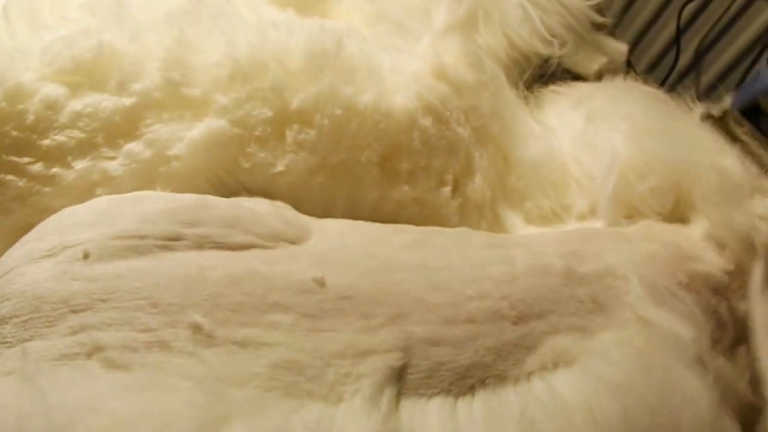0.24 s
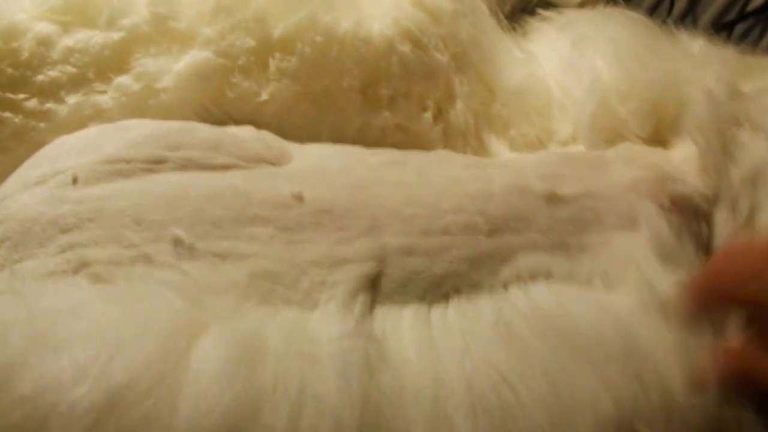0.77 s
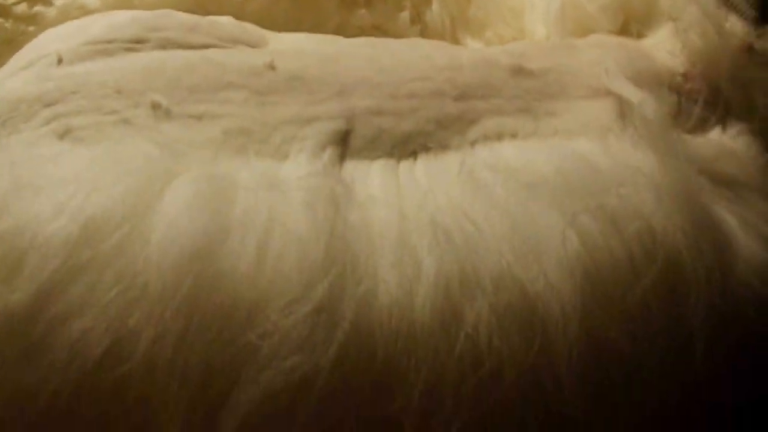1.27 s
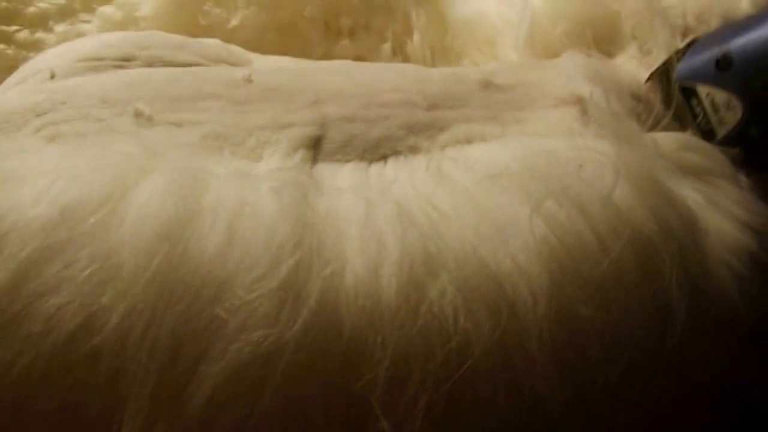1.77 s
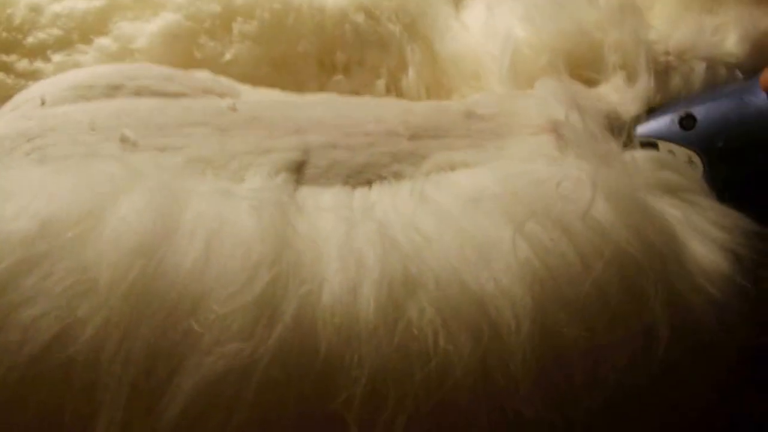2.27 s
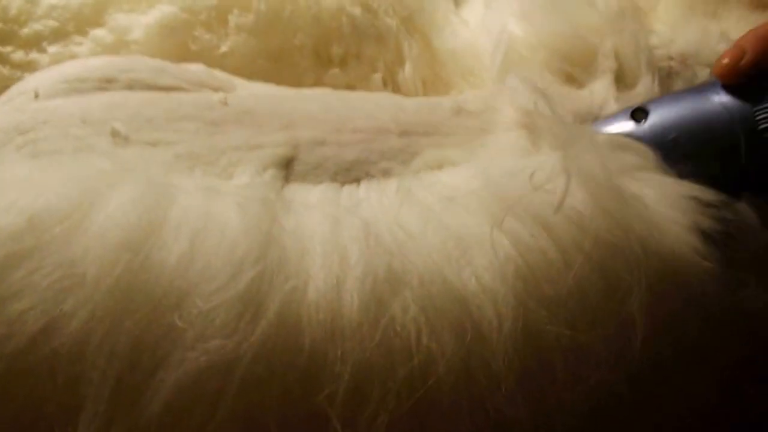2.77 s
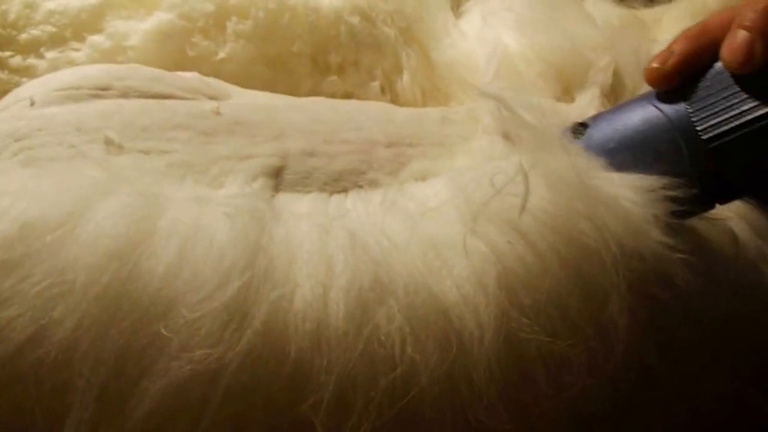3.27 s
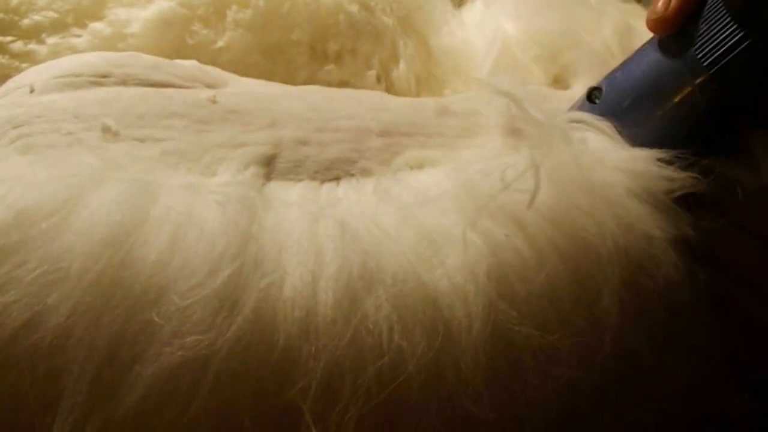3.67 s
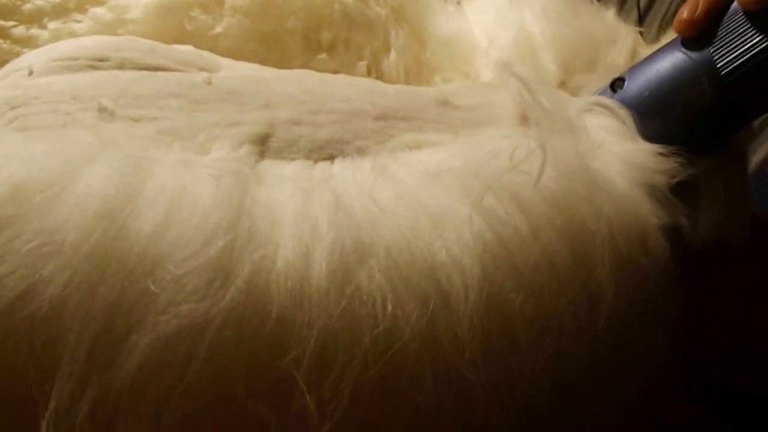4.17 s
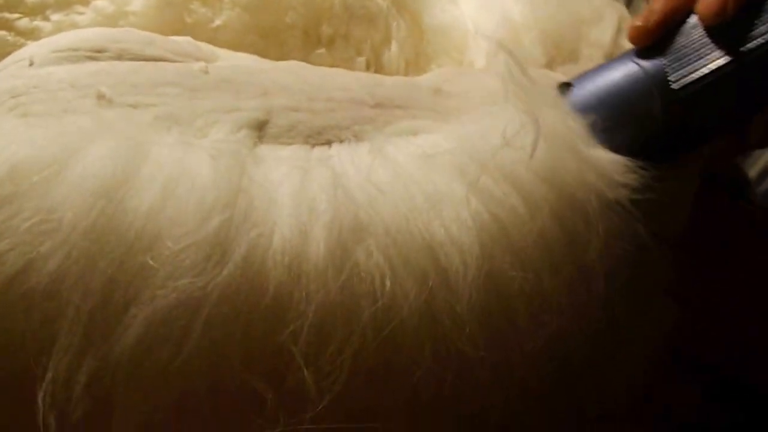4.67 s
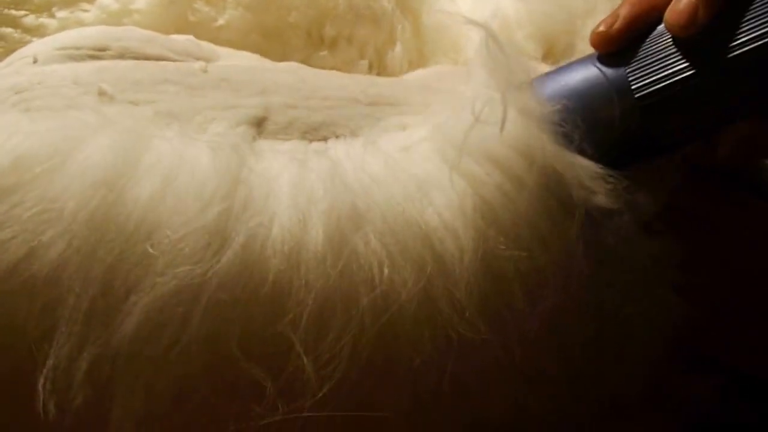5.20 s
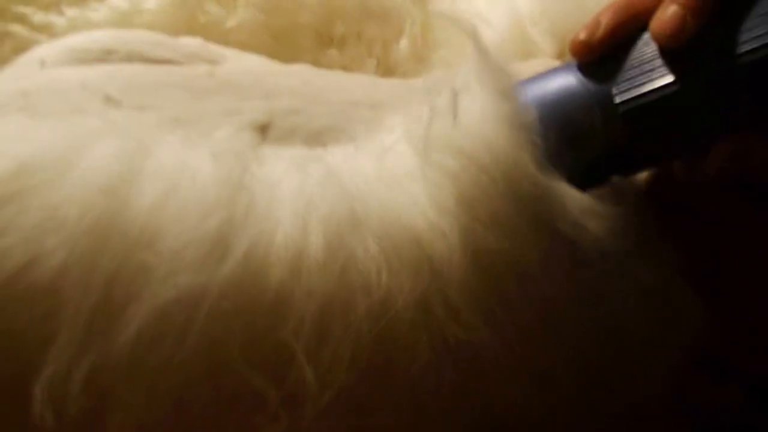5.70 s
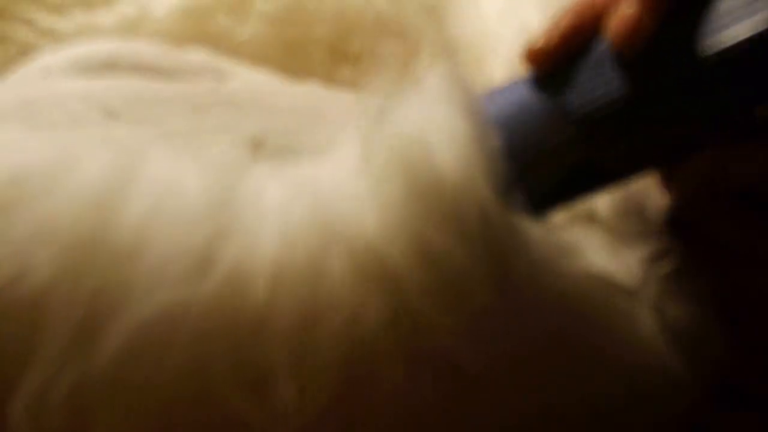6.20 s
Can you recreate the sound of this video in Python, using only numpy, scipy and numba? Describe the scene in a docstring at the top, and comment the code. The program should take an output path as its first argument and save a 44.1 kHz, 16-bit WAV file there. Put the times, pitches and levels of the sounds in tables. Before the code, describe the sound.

A continuous, bright clipper buzz, close and slightly right of centre, in a quiet indoor space. Fast blade reversals make a coarse metallic chatter, with a whining motor, ringing plastic housing and sizzling steel. Near one second there is a lone hard click. Later the buzz grows grittier and slightly lower as fur loads the blade, hair crunching faintly, while a hand brushes the coat almost inaudibly underneath.

```python
"""Electric clippers shear a long-haired animal, close to the microphone.
From the start a motor whines and drives a cam through a 3:20 gear; the cam throws the blade to and fro, and each
reversal knocks the housing. Gear teeth and blade rasp in a pattern that repeats every six strokes, hair crunches,
and the motor slows a little as the blade bites into fur. Single tones flare up and sink, over a faint room rumble.
After about a second something clicks once; then a hand rustles in the coat, with two soft bumps.
A limiter turns the sound down after the highest peaks."""
import sys
import numpy as np
from scipy import signal
from scipy.fft import rfft, irfft
from scipy.io import wavfile
from scipy.ndimage import uniform_filter1d, map_coordinates
from numba import njit

SR = 44100
rng = np.random.default_rng(int(sys.argv[2]) if len(sys.argv) > 2 else 0)


def waveform_to_disk(signal):
    """Save audio, clipped to [-1, 1], as 16-bit WAV at the path in sys.argv[1]."""
    frames = np.transpose(np.atleast_2d(signal))
    scaled = np.clip(frames, -1, 1) * 32767
    samples = np.round(scaled).astype(np.int16)
    wavfile.write(sys.argv[1], SR, samples)


N = 284429
T = np.arange(N) / SR
FREQS = np.maximum(np.arange(N // 2 + 1) * SR / N, 1)

# one gear cycle: 20 motor turns make 3 cam turns, and each cam turn makes two strokes
CAM_RATIO, STROKES, MOTOR_TURNS = 3 / 20, 6, 20
# turns of the bearing cage per turn of the motor, and the point in its turn where the play is widest (turns)
CAGE_RATIO, CAGE_PLAY = 0.3283, 0.35
# motor speed with no load (turns per second); the sag below it shows how hard the blade works
FREE_HZ = 305.5
# the motor speed trembles slightly: typical size (turns per second) and changes per second
TREMBLE_HZ, TREMBLES_PER_S = 0.15, 14
# motor speed, which sags when the blade meets thick fur: time_s, speed_hz
MOTOR_SPEED = [(0, 303), (0.35, 304.93), (0.95, 305.53), (1.7, 305.06), (2.2, 305.45), (2.8, 305.05),
               (3.2, 303.47), (3.75, 303.52), (4.35, 304.26), (4.75, 303.09), (5.35, 304.88), (5.8, 303.73),
               (6.15, 303.77), (6.45, 304.88)]

# steady tones of motor and gear: multiple (of the motor speed), level_db
STEADY_TONES = [(0.1, -63), (0.15, -62), (1.65, -64), (1.8, -58), (1.95, -59), (2.4, -55.5), (2.7, -56),
                (3.75, -54), (3.9, -51), (4.35, -54), (4.5, -55), (4.8, -51), (4.95, -53.5), (5.1, -48.5),
                (5.25, -50), (5.55, -48.5), (5.7, -54), (5.85, -47.5), (6.15, -51), (6.3, -47.5),
                (6.45, -47.5), (6.6, -49), (6.75, -49), (7, -47), (7.65, -40.5), (8, -44), (8.25, -42.5),
                (8.55, -44), (9, -42.5), (9.7, -41), (10, -40), (11.4, -44), (14, -52.5), (17, -55),
                (18, -56), (20, -53), (21, -48), (22, -46), (27, -43), (29, -43.5), (30, -56), (31, -51.5),
                (33, -56)]
# the strongest tones: name, multiple (of the motor speed)
# the bearing cage adds side tones, and "beat" beats against a gear tone
SINGING_TONES = {"hum": 1.05, "purr": 1.35, "rotor": 2, "growl": 4, "drone": 6, "beat": 8 - CAGE_RATIO,
                 "grind": 7.95, "mesh": 10.05, "snarl": 10.35, "burr": 10.65, "ring": 11, "zing": 11.7,
                 "sing": 12, "low warble": 16 - CAGE_RATIO, "warble": 16, "high warble": 16 + CAGE_RATIO,
                 "whine": 24, "keen": 25, "shrill": 26, "sizzle": 28, "squeak": 32}
# level of the singing tones between flares: name, level_db
RESTING_TONE_LEVELS = {"hum": -67.5, "purr": -65, "rotor": -48.2, "growl": -47, "drone": -46, "beat": -43,
                       "grind": -49, "mesh": -38.5, "snarl": -48, "burr": -43.5, "ring": -37.5, "zing": -43,
                       "sing": -38.5, "low warble": -52, "warble": -47, "high warble": -55, "whine": -41.5,
                       "keen": -36.5, "shrill": -45, "sizzle": -40, "squeak": -47.5, "squeal": -27}
# a tone flares up or sinks as the clippers lean into or out of a resonance: start_s, end_s, name, gain_db
FLARES = [(1.3, 6.6, "hum", 3), (1.75, 6.6, "hum", 6.5), (4.5, 6.6, "hum", 4.5), (1.25, 6.6, "purr", 6),
          (2.1, 6.6, "purr", 4.5), (1.62, 1.85, "rotor", -9), (2.9, 3.5, "rotor", -7),
          (4.85, 6.6, "rotor", -5), (6.1, 6.35, "rotor", -7), (1.6, 1.85, "growl", -9),
          (3.7, 6.6, "growl", 3), (0.42, 1.15, "drone", 7), (0.45, 0.92, "drone", 5.5),
          (1.45, 2.25, "drone", 7), (3.4, 4.15, "drone", 7), (5.85, 6.6, "drone", 7.5),
          (2.2, 2.85, "beat", -5), (2.9, 6.6, "beat", 1.5), (4.65, 6.6, "grind", 9),
          (2.25, 4.75, "mesh", 5), (2.9, 3.7, "mesh", 2.5), (5.5, 6.1, "mesh", -5), (5.9, 6.6, "snarl", 12),
          (1.4, 3.1, "burr", 5), (1.05, 1.27, "ring", 7), (1.8, 2.6, "ring", 7), (2.88, 3.7, "ring", 6),
          (4.05, 4.7, "ring", -9), (1.25, 1.65, "zing", 10), (-0.1, 0.85, "sing", -7),
          (2.45, 3.15, "sing", -6), (3.55, 3.9, "sing", -12), (4.5, 6.6, "sing", 3),
          (0, 0.35, "low warble", 8), (0.6, 0.92, "low warble", 8), (1.12, 1.55, "low warble", 6),
          (1.85, 2.4, "low warble", 8), (2.6, 3.55, "low warble", 6.5), (5.6, 6.3, "low warble", 4),
          (0.06, 0.33, "warble", 6), (1.5, 1.8, "warble", -7), (1.9, 3.15, "warble", 3),
          (2.55, 3.1, "warble", 3.5), (3.22, 3.5, "warble", -10), (3.65, 4.05, "warble", 4),
          (4.2, 4.85, "warble", -3), (5.52, 6.2, "warble", 6), (0.76, 1, "high warble", 10),
          (1.22, 1.62, "high warble", 11), (2.15, 2.62, "high warble", 10), (2.62, 3.1, "high warble", 4),
          (6.32, 6.6, "high warble", 11), (0.22, 0.55, "whine", 10), (0.62, 1.15, "whine", 9),
          (1.22, 1.42, "whine", 8), (1.55, 1.85, "whine", 8), (2.03, 2.55, "whine", 10),
          (3.95, 4.5, "whine", 6), (4.68, 5.85, "whine", 9), (1.85, 2.95, "keen", -9), (4.5, 5, "keen", -5),
          (6.1, 6.6, "keen", -8), (3.9, 4.7, "shrill", 6), (6.28, 6.6, "shrill", 10),
          (0, 0.22, "sizzle", 4), (1.75, 2.75, "sizzle", -8), (4.45, 4.7, "sizzle", -10),
          (0.45, 1.05, "squeak", 5), (1.1, 1.75, "squeak", -6), (3.05, 4.05, "squeak", 7),
          (4.15, 6.3, "squeak", 4), (5.7, 6.3, "squeak", 4.5), (1.5, 1.8, "squeal", 7.5),
          (1.8, 2.5, "squeal", 2), (3.3, 4.2, "squeal", 3)]
FLARE_FADE_S = 0.16
# short waves fade in and out as the clippers move: pitch_hz, depth (share of the tone)
FADING_DEPTH = [(300, 0.081), (1800, 0.12), (3300, 0.26), (5000, 0.49), (8000, .42)]
# changes per second of the slow fading and of the quick flutter, and the flutter's share
FADING_HZ, FLUTTER_HZ, FLUTTER_SHARE = 3.533, 17, 0.92
# the tight spot of the gear: place and half-width (strokes)
SQUEAL_PLACE, SQUEAL_WIDTH = 3.4, 0.65

# the six blade reversals of one gear cycle: place (strokes), free_force_db (running free),
# load_db (added at full drag), swing_db (up and down with the bearing cage)
REVERSALS = [(0.14, -13, 7, 0), (1.13, -7, 5, 0.5), (2.07, -7.5, 2, 0), (3.1, -6, 7, 0.5),
             (4.13, -8.5, 3, 0), (5.13, -4, 2.5, 2.2)]
# drag of the fur on the blade: time_s, drag (0 free to 1 full)
FUR_DRAG = [(0, 0.29), (0.95, 0.26), (1.8, 0.16), (2.45, 0.027), (3.2, 0.49), (4.3, 0.23), (4.75, 0.44),
            (5.3, 0.87), (5.9, 0.49), (6.45, 0.51)]
KNOCK_DB = -13.2
# the hand on the housing: time_s, housing_level_db (before both rings are adjusted),
# upper_ring_db (how far the grip frees or damps the ring), ring_pitch_hz
HAND_HOLD = [(0, -25, 2.5, 3150), (0.4, -26.5, 6, 2900), (0.8, -25, -2, 3180), (1.05, -25.5, 2.5, 3330),
             (1.3, -26, 4, 3130), (1.7, -24.5, 0, 3370), (2.1, -26, 0, 3270), (2.55, -30, 7, 3060),
             (3.25, -23.5, -0.5, 3160), (3.9, -26, -3, 3180), (4.4, -26, 2, 3080), (4.75, -25.5, -3, 3150),
             (5.6, -26.5, -2, 3100), (6.25, -23.5, 2.5, 3220), (6.45, -25.5, 5.5, 3280)]
# response of the plastic housing: pitch_hz, level_db
HOUSING_RESPONSE = [(760, -38), (1300, -17.5), (1690, -11.5), (1840, -15), (2220, -9), (2360, -10),
                    (2630, -6), (3240, 0), (3650, -6.5), (3860, -11.5), (4460, -24), (4600, -21.5),
                    (5980, -61.5), (10100, -120)]
# the lower ring of the housing: its change with no drag (dB), and what full drag adds (dB)
LOWER_RING_DB, LOWER_DRAG_DB = -5.5, 2.5
# the upper ring comes and goes in short clumps: typical swing (dB), changes per second
CLUMP_DB, CLUMPS_PER_S = 1.6, 20
# the gear catches and slips, so its rasp comes in short grains: typical swing (dB), changes per second
CATCH_DB, CATCHES_PER_S = 1.5, 300
# level of the blades' treble: time_s, level_db
BLADE_LEVEL = [(0, -29), (0.4, -30), (0.8, -27), (1.3, -28), (2.1, -31.5), (2.7, -30), (3.1, -29.5),
               (6.1, -28), (6.45, -27.5)]
# response of the steel blades: pitch_hz, level_db
STEEL_RESPONSE = [(2590, -36.5), (4400, -18.5), (4570, -20), (4810, -11), (5210, -9.5), (6040, -7),
                  (7490, 2.5), (9300, -5), (10100, -10), (10500, -16), (11800, -32), (14600, -24),
                  (15500, -28)]
# the shaking of the motor reaches the blades mostly in the top: pitch_hz, level_db
SHAKE_RESPONSE = [(6900, -10), (9800, -8), (10600, 3), (12000, 5.5)]
# the cut hair crunches louder under load
HAIR_DB, HAIR_DB_PER_SAG_HZ = -38.5, 0.4
# colour of hair crunching between the teeth: pitch_hz, level_db
HAIR_RESPONSE = [(150, -23), (250, -18.5), (330, -16.5), (440, -14.5), (600, -9.5), (760, -8), (950, 0.5),
                 (1150, -3), (1400, -11), (2000, -24), (4000, -28.5)]

# room rumble: pitch_hz, level_db
ROOM_RESPONSE = [(15, -9), (28, 3), (46, -1.5), (65, -8), (110, -9.5), (170, -19), (300, -23)]
# a lone click and soft bumps of the hand: start_s, level_db, pitch_hz, decay_s (twice the time to the peak)
CLICKS = [(1.0573, -3.5, 2150, 0.0011), (1.82, -53, 171, 0.037), (5.57, -49, 115, 0.045)]
# strokes of the hand in the coat: start_s, length_s, level_db
RUSTLES = [(1.777, 0.1, -46), (3.9, 0.11, -50), (4.137, 0.13, -49), (4.51, 0.17, -50), (4.95, 0.15, -49),
           (5.105, 0.11, -48), (5.308, 0.55, -47.5), (5.817, 0.34, -50.5)]
RESTING_HAND_DB = -61.5  # middle of its drift

# phase by which the left microphone port leads the right, below zero where it lags: pitch_hz, phase_radians
PORT_PHASE = [(20, 0), (1850, -.02), (2300, -.33), (3400, -.45), (5900, -.85), (8000, -1.15), (11000, -1.7),
              (15000, -2.2)]
# share of the sound that near surfaces throw back: pitch_hz, level_db
REFLECTED = [(60, -22), (300, -26), (600, -17), (1500, -28), (2500, -17), (5000, -11), (8500, -9),
             (13000, 3)]
TOP_HZ = 15500  # the treble is cut off above this


def undb(db):
    """Decibels to gain."""
    return 10 ** (np.asarray(db) / 20)


def unit(x):
    """Scale to rms 1."""
    return x / np.sqrt(np.mean(x ** 2))


def curves(table):
    """Turn each column after the time into a value for every sample."""
    s, *columns = np.transpose(table)
    return [np.interp(T, s, c) for c in columns]


def walk(rate):
    """Smooth random drift with a spread near 1."""
    knots = rng.standard_normal(int(N / SR * rate) + 3)
    fine = signal.resample_poly(knots, 8, 1)
    return np.interp(T * rate * 8, np.arange(len(fine)), fine)


def colour(x, points):
    """Ring a causal filter whose response passes through the (Hz, dB) points."""
    hz, db = np.transpose(points)
    gain = undb(np.interp(np.log(FREQS), np.log(hz), db))
    # folding the cepstrum puts all the ringing after the sound that causes it
    cepstrum = irfft(np.log(gain), N)
    cepstrum[1:N // 2] *= 2
    cepstrum[N // 2 + 1:] = 0
    return irfft(rfft(x) * np.exp(rfft(cepstrum)), N)


def resonance(x, hz, width_hz):
    """One damped resonance, gain 1 at its centre."""
    return irfft(rfft(x) / (1 + 1j * (FREQS ** 2 - hz ** 2) / (FREQS * width_hz)), N)


@njit
def moving_resonance(x, hz, width_hz):
    """A resonance whose centre moves, gain 1 at the centre."""
    out, band, low = np.empty(len(x)), 0., 0.
    for i in range(len(x)):
        g, k = np.tan(np.pi * hz[i] / SR), width_hz / hz[i]
        v = (band + g * (x[i] - low)) / (1 + g * (g + k))
        band, low, out[i] = 2 * v - band, low + 2 * g * v, k * v
    return out


def flare_gain(name):
    """Gain in dB of one tone: each of its flares fades in, holds and fades out."""
    gain_db = 0
    for start, end, which, db in FLARES:
        if which == name:
            gain_db = gain_db + db * np.clip(.5 + np.minimum(T - start, end - T) / FLARE_FADE_S, 0, 1)
    return gain_db


def tone(turns, multiple, db):
    """One tone locked to the shaft; it fades and flutters in strength and phase, by a depth set by its pitch."""
    depth = np.interp(multiple * FREE_HZ, *np.transpose(FADING_DEPTH))
    fading = walk(FADING_HZ) + 1j * walk(FADING_HZ)
    flutter = walk(FLUTTER_HZ) + 1j * walk(FLUTTER_HZ)
    stray = fading + FLUTTER_SHARE * flutter
    wave = (1 + depth * stray / np.sqrt(2)) * np.exp(2j * np.pi * (multiple * turns + rng.random()))
    return undb(db) * unit(wave.imag)


def motor(turns):
    """Tones of rotor, bearings and gear mesh follow the shaft; a tight spot in the gear squeals once a cycle."""
    steady = sum(tone(turns, multiple, db) for multiple, db in STEADY_TONES)
    singing = sum(tone(turns, multiple, RESTING_TONE_LEVELS[name] + flare_gain(name))
                  for name, multiple in SINGING_TONES.items())
    place = 2 * CAM_RATIO * turns % STROKES
    tight = np.exp(-((place - SQUEAL_PLACE) / SQUEAL_WIDTH) ** 2)
    squeal = tone(turns, SINGING_TONES["burr"], RESTING_TONE_LEVELS["squeal"] + flare_gain("squeal"))
    return steady + singing + tight * squeal


def reversals(turns, drag, scatter_db, jitter_s):
    """One impulse per change of blade direction; drag and the play in the bearing change its force."""
    strokes = 2 * CAM_RATIO * turns
    cycles = np.arange(int(strokes[-1] / STROKES) + 1)
    place, free_db, load_db, swing_db = np.transpose(REVERSALS)
    free_db, load_db, swing_db = [np.tile(c, len(cycles)) for c in (free_db, load_db, swing_db)]
    chance = rng.standard_normal((len(cycles) * STROKES, 2))
    at = np.interp((STROKES * cycles[:, None] + place).ravel(), strokes, T, right=np.inf)
    at = at + jitter_s * chance[:, 0]
    play = np.cos(2 * np.pi * (CAGE_RATIO * np.interp(at, T, turns) - CAGE_PLAY))
    force = undb(free_db + load_db * np.interp(at, T, drag) + swing_db * play + scatter_db * chance[:, 1])
    # share each impulse between the two nearest samples, to time it finely
    inside = (at > 0) & (at * SR < N - 2)
    index, part = np.divmod(at[inside] * SR, 1)
    index, force = index.astype(int), force[inside]
    return np.bincount(index, force * (1 - part), N) + np.bincount(index + 1, force * part, N)


def chatter(blows, width_s):
    """Contact pressure, which rises and falls round each reversal."""
    lag = np.arange(-SR // 50, SR // 50 + 1) / SR
    return signal.fftconvolve(blows, np.exp(-np.abs(lag) / width_s), "same")


def bending_wave(blows, first_hz, last_hz, length_s):
    """A blow spreads along the housing: high bending waves arrive first, so each knock slides down in pitch."""
    age = T[:int(length_s * SR)]
    swell = np.sin(np.pi * age / length_s) ** 2
    wave = swell * signal.chirp(age, first_hz, length_s, last_hz, method="logarithmic")
    # the strongest part falls on the reversal itself
    return signal.fftconvolve(blows, wave, "same")


def surface(laps):
    """A rough track passed over again on every lap."""
    size = int(N / laps[-1])
    track = rng.standard_normal(size)
    return unit(map_coordinates(track, [laps % 1 * size], order=3, mode="grid-wrap"))


def shifting(laps, rate):
    """Contact slides between two rough tracks as the pressure changes; the strength stays even."""
    angle = 1.61 * walk(rate)
    return np.cos(angle) * surface(laps) + np.sin(angle) * surface(laps)


def rasp(turns, blade_db, shift_db, loose_db, shift_rate):
    """Sliding contact: marks on gear and blade repeat, contact shifts slowly, hair adds fresh noise."""
    cycles, strokes = turns / MOTOR_TURNS, 2 * CAM_RATIO * turns
    # the blade drags the opposite way on every other stroke
    direction = (-1) ** np.floor(strokes)
    gear_marks = surface(cycles)
    blade_marks = undb(blade_db) * shifting(strokes, shift_rate) * direction
    shifted = undb(shift_db) * shifting(cycles, shift_rate)
    loose = undb(loose_db) * rng.standard_normal(N)
    return unit(gear_marks + blade_marks + shifted + loose)


def housing_rasp(turns, drag, pressure, tufts):
    """The rasp of the gear rings the housing; drag feeds the lower ring, the grip frees and shifts the upper."""
    housing_db, upper_db, ring_hz = curves(HAND_HOLD)
    gear = rasp(turns, blade_db=1.5, shift_db=3.5, loose_db=4.0, shift_rate=1.808)
    # the pinion bites harder once a turn, and the load falls away in mid-stroke
    pinion = 0.36 * np.cos(2 * np.pi * turns)
    load = 0.083 * np.cos(2 * np.pi * (2 * CAM_RATIO * turns - .13))
    catches = undb(CATCH_DB * walk(CATCHES_PER_S))
    body = unit(colour(gear * catches * (1 + pinion + load + 0.28 * pressure), HOUSING_RESPONSE))
    lower_gain = undb(LOWER_RING_DB + LOWER_DRAG_DB * drag)
    upper_gain = undb(upper_db + CLUMP_DB * walk(CLUMPS_PER_S))
    lower_ring = (lower_gain - 1) * resonance(body, 2200, 810)
    upper_ring = (upper_gain - 1) * moving_resonance(body, ring_hz, 270.0)
    return (body + lower_ring + upper_ring) * undb(housing_db + 0.51 * tufts)


def steel_buzz(turns, pressure, tufts):
    """Sliding blades ring the steel, and each motor turn shakes them; motor and cage ripple their loudness."""
    slide = rasp(turns, blade_db=7.5, shift_db=2, loose_db=11.5, shift_rate=2.5)
    shake = unit(colour(shifting(turns, rate=2.455), SHAKE_RESPONSE))
    ripple = 1 + 0.09 * np.cos(2 * np.pi * turns) + 0.06 * np.cos(2 * np.pi * CAGE_RATIO * turns)
    blade = unit(colour((slide + shake) * ripple * (1 + 0.5 * pressure), STEEL_RESPONSE))
    return blade * undb(curves(BLADE_LEVEL)[0] + 0.62 * tufts)


def hair_crunch(turns, sag_hz, pressure):
    """Hair crunches between the teeth, pressed at each reversal and louder as the motor sags."""
    hair = rasp(turns, blade_db=2.0, shift_db=5.0, loose_db=10.5, shift_rate=3)
    crunch = unit(colour(hair * (1 + 0.95 * pressure), HAIR_RESPONSE))
    return crunch * undb(HAIR_DB + HAIR_DB_PER_SAG_HZ * sag_hz)


def cutter(turns, sag_hz):
    """The same reversals knock the housing and press on gear, blades and hair."""
    drag = curves(FUR_DRAG)[0]
    blows = reversals(turns, drag, scatter_db=0.8, jitter_s=.00004)
    pressure = chatter(blows, width_s=0.0017)
    knocks = undb(KNOCK_DB) * bending_wave(blows, first_hz=4156, last_hz=1554, length_s=0.004491)
    tufts = walk(11)  # tufts pass unevenly between the teeth
    body = housing_rasp(turns, drag, pressure, tufts)
    return knocks + body + steel_buzz(turns, pressure, tufts) + hair_crunch(turns, sag_hz, pressure)


def room_rumble():
    """Low rumble of the room: noise with little treble."""
    return undb(-53.5) * unit(colour(rng.standard_normal(N), ROOM_RESPONSE))


def handling():
    """A sharp click, the dull rustle of a hand in the coat, swelling with each stroke, and soft bumps."""
    rustle = resonance(resonance(rng.standard_normal(N), 277, 150), 277, 150)
    strokes = sum(undb(db) * np.sin(np.pi * np.clip((T - s) / length, 0, 1)) for s, length, db in RUSTLES)
    resting = undb(RESTING_HAND_DB + 3.6 * walk(7.1))
    out = unit(rustle) * np.hypot(strokes, resting)
    for s, db, hz, decay_s in CLICKS:
        age = np.maximum(T - s, 0)
        # quick rise to 1, then a slower fall
        envelope = np.exp(1 - 2 * age / decay_s) * 2 * age / decay_s
        out = out + undb(db) * envelope * np.sin(2 * np.pi * hz * age)
    return out


def port_difference(mid):
    """Half the difference between the ports, which the sound reaches out of step."""
    phase = np.interp(FREQS, *np.transpose(PORT_PHASE))
    return irfft(rfft(mid) * 1j * np.tan(phase / 2), N)


def reflections(mid):
    """Faint treble reflections from the surroundings, which differ between the ports."""
    age = T[:SR // 20]
    scatter = rng.standard_normal(len(age)) * np.exp(-age / 0.0008)
    return undb(-50) * unit(signal.fftconvolve(colour(mid, REFLECTED), scatter)[:N])


def scene():
    """The clippers sit a little to the right and reach the two ports out of step."""
    speed_hz = curves(MOTOR_SPEED)[0]
    turns = np.cumsum(speed_hz + TREMBLE_HZ * walk(TREMBLES_PER_S)) / SR
    mid = motor(turns) + cutter(turns, FREE_HZ - speed_hz) + room_rumble() + handling()
    side = port_difference(mid) + reflections(mid)
    return np.array([mid + side, mid - side])


@njit
def peak_follower(x, release):
    """Jumps to each peak and sinks back slowly."""
    out, e = np.empty(len(x)), 0.
    for i in range(len(x)):
        e = max(x[i], e * release)
        out[i] = e
    return out


def record(dry, limit_db=-5, release_s=0.18):
    """A limiter ducks after the highest peaks; the top is cut off."""
    peak = peak_follower(np.abs(dry).max(axis=0), np.exp(-1 / (release_s * SR)))
    gain = np.minimum(1, undb(limit_db) / (peak + 1e-9))
    gain = uniform_filter1d(gain, size=40)  # smooth over 40 samples
    low_pass = signal.ellip(8, .2, 70, TOP_HZ, fs=SR, output="sos")
    return signal.sosfilt(low_pass, dry * gain)


dry = scene()
out = record(dry)
waveform_to_disk(out)
```